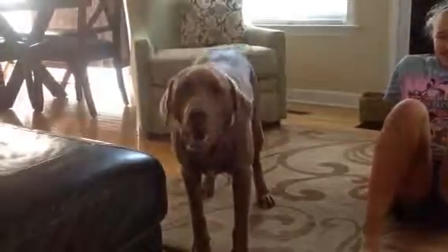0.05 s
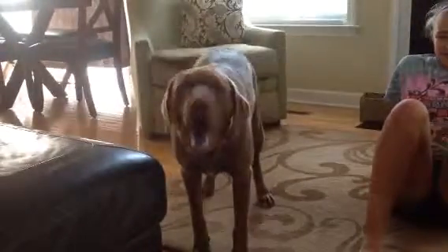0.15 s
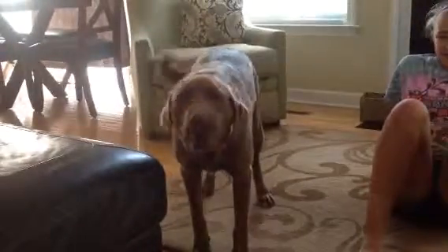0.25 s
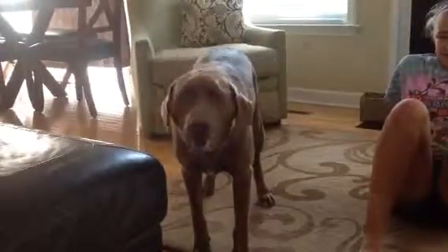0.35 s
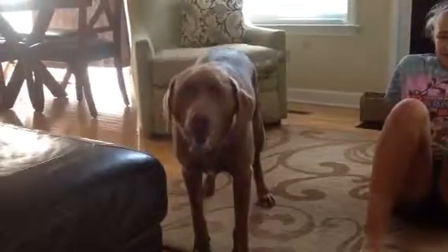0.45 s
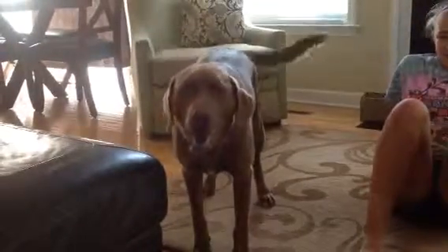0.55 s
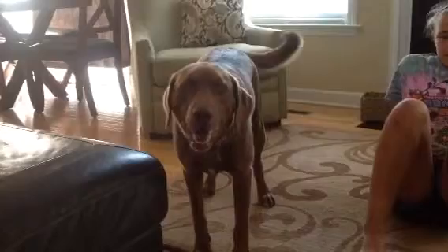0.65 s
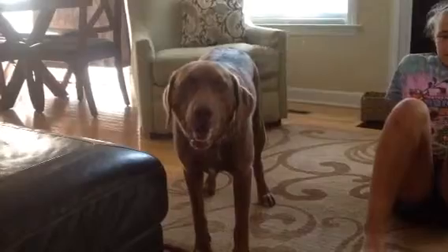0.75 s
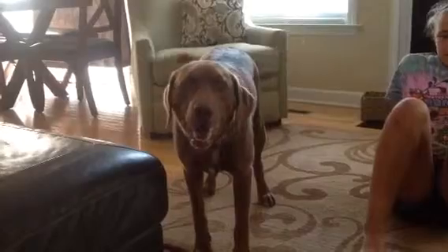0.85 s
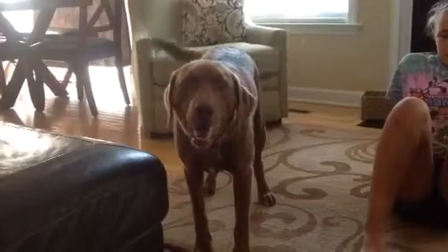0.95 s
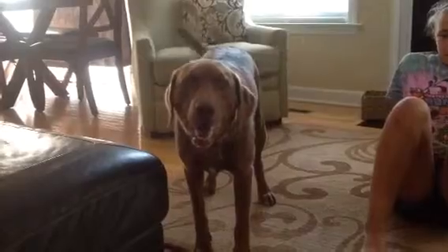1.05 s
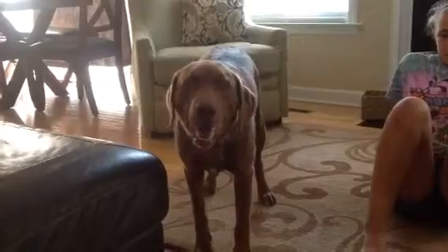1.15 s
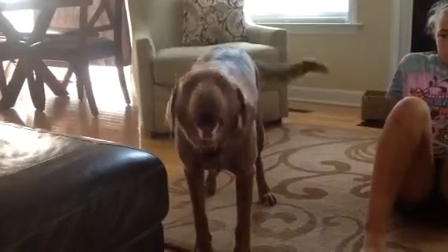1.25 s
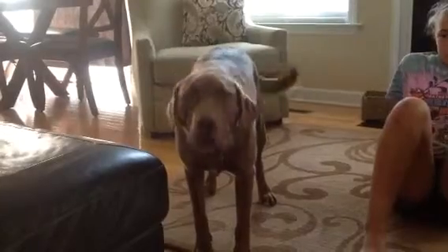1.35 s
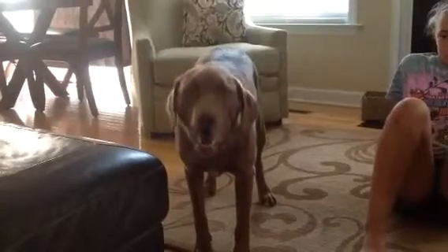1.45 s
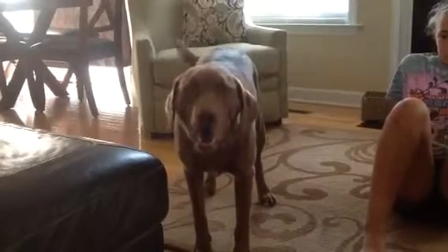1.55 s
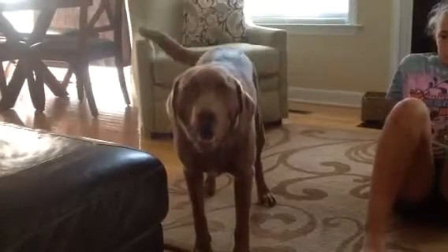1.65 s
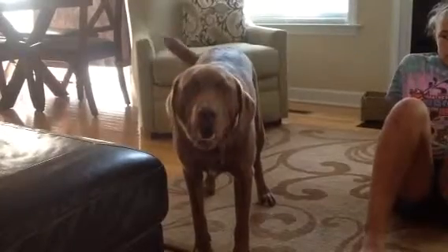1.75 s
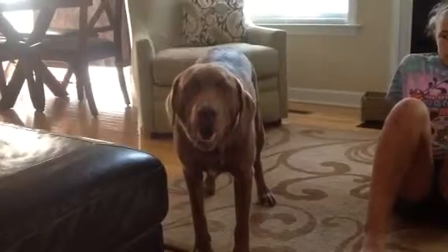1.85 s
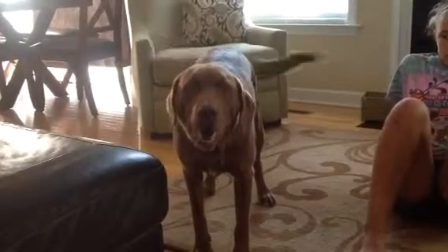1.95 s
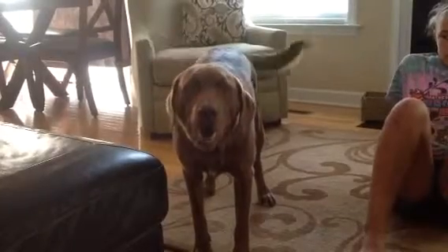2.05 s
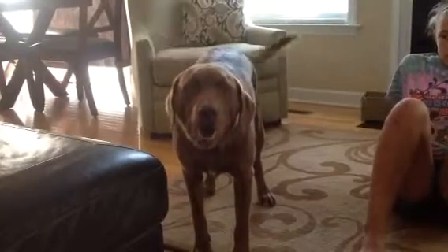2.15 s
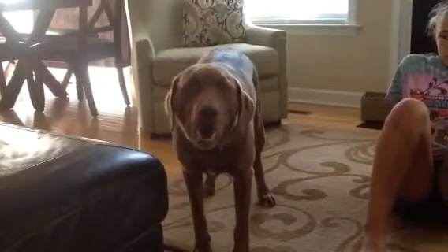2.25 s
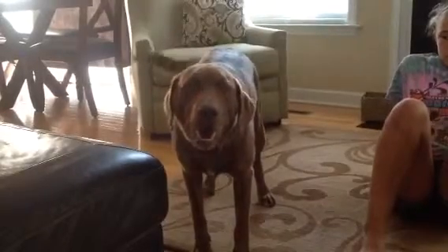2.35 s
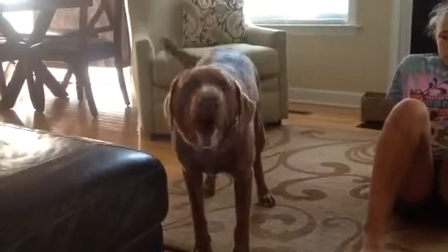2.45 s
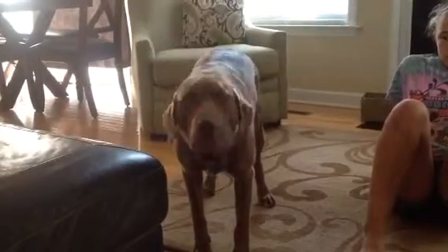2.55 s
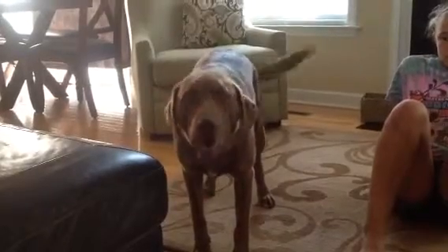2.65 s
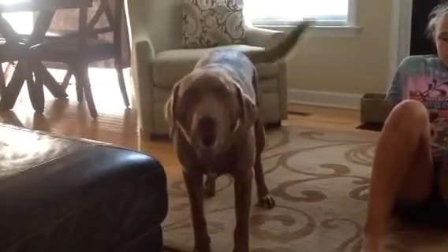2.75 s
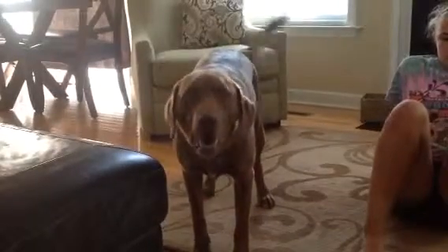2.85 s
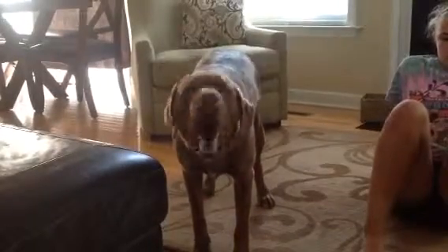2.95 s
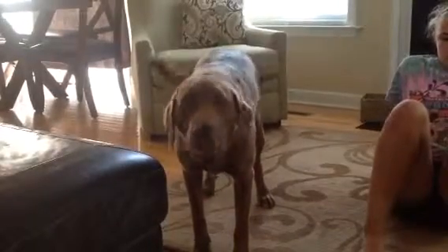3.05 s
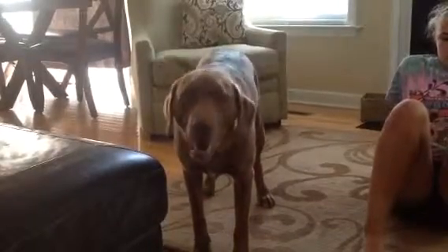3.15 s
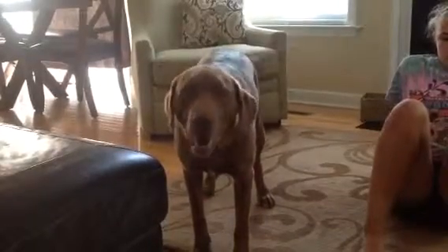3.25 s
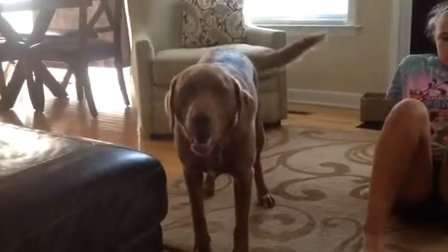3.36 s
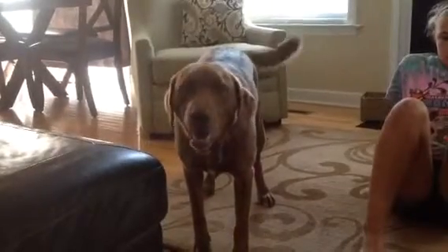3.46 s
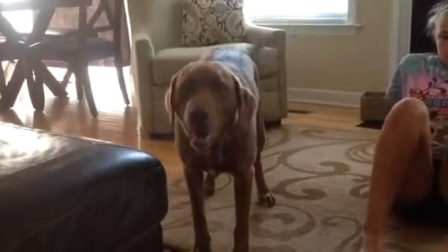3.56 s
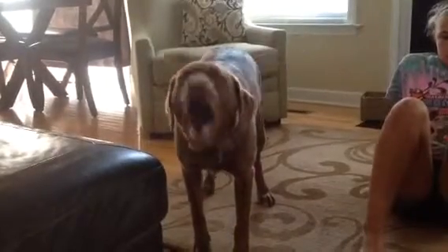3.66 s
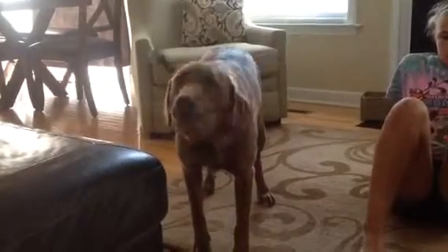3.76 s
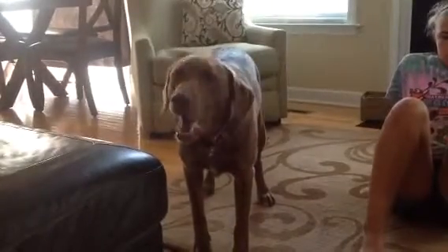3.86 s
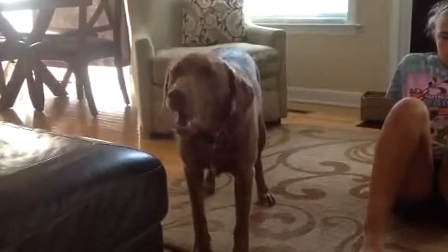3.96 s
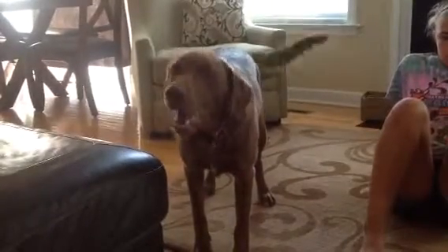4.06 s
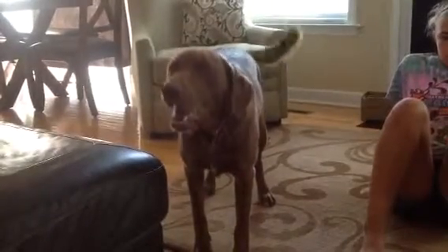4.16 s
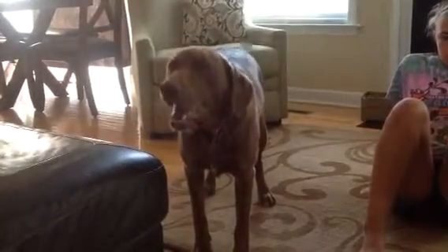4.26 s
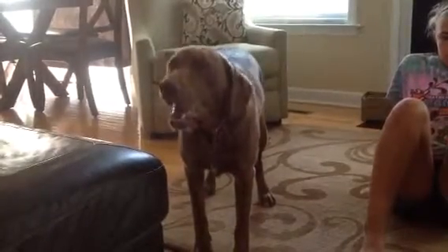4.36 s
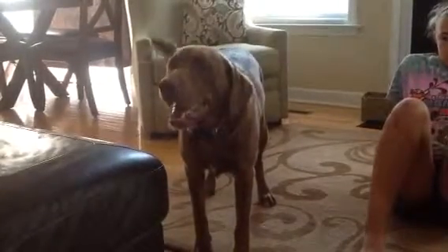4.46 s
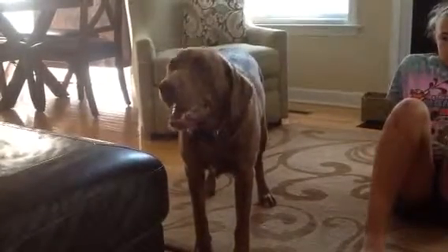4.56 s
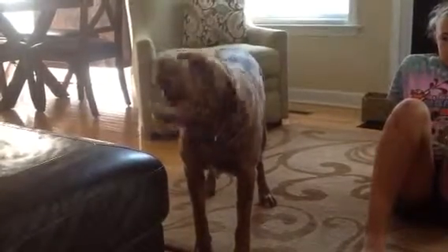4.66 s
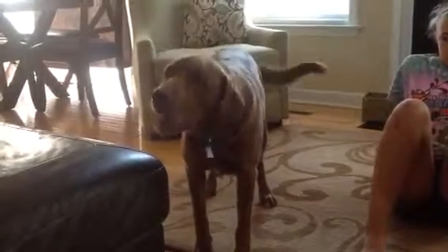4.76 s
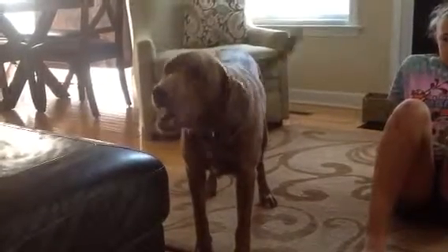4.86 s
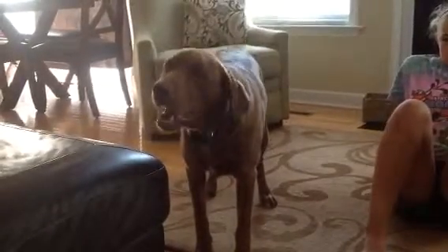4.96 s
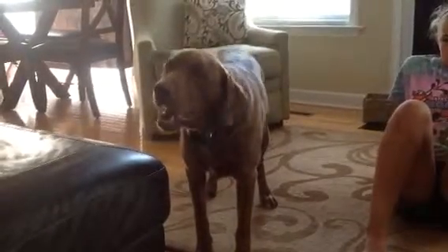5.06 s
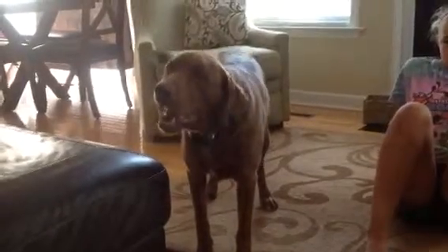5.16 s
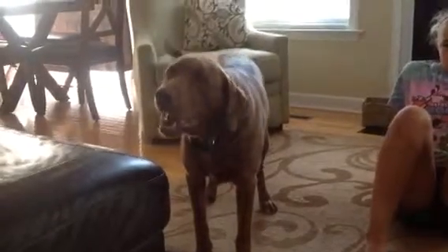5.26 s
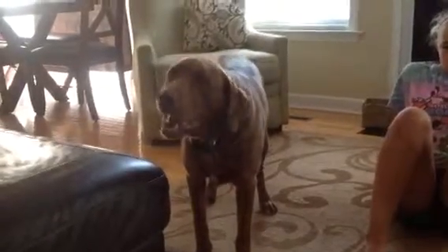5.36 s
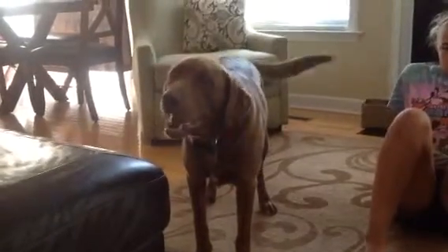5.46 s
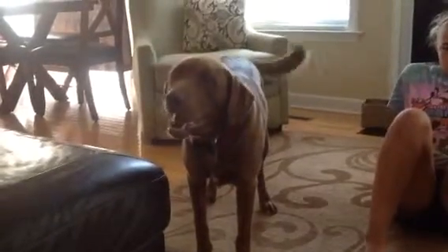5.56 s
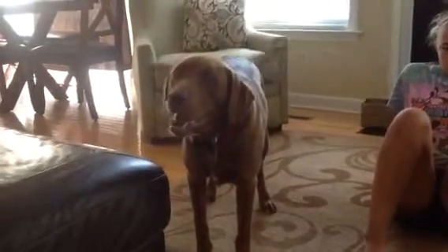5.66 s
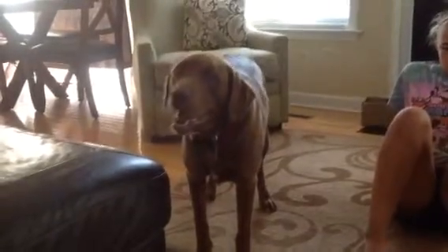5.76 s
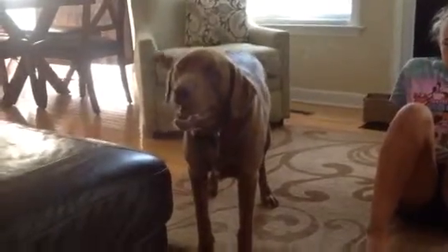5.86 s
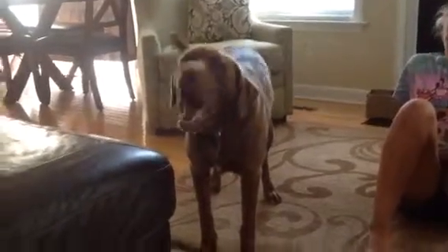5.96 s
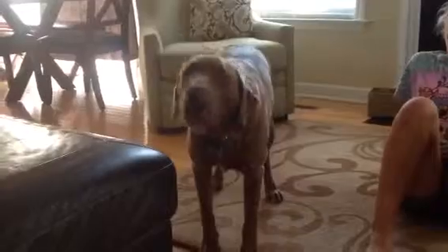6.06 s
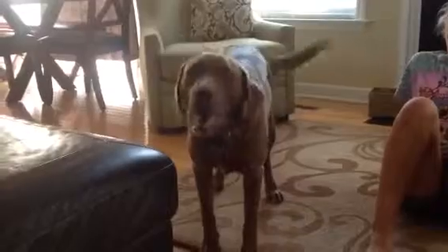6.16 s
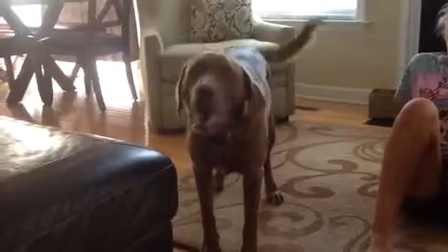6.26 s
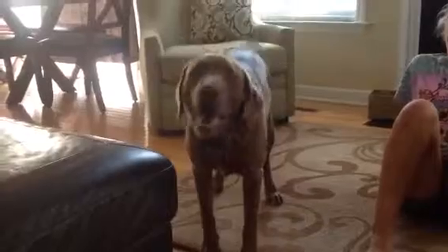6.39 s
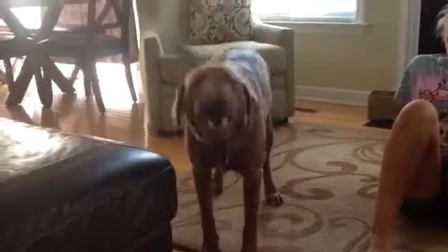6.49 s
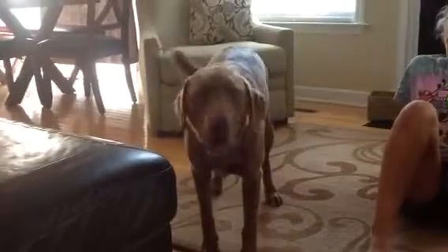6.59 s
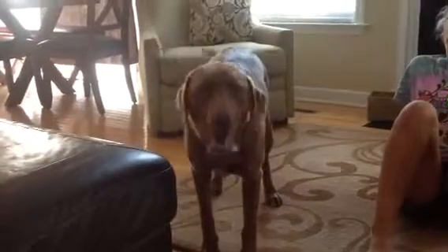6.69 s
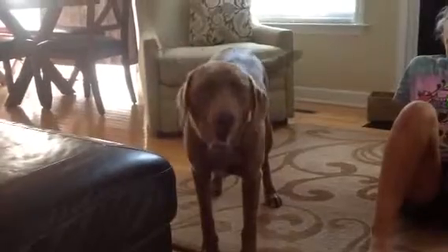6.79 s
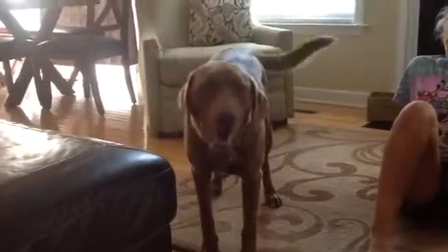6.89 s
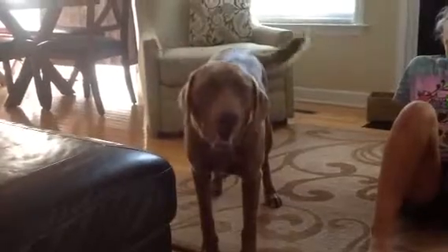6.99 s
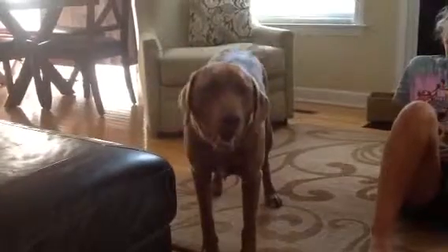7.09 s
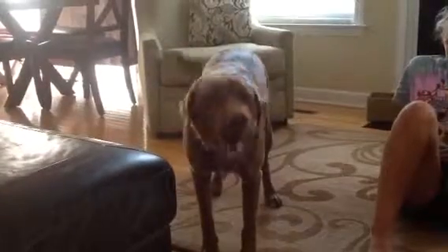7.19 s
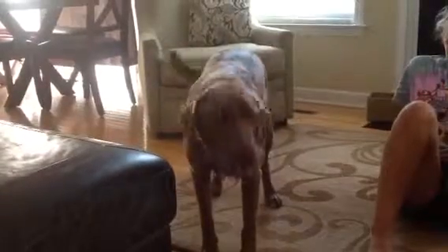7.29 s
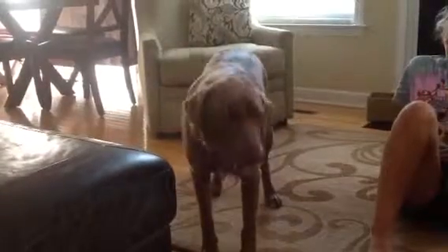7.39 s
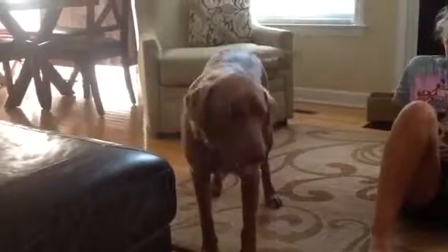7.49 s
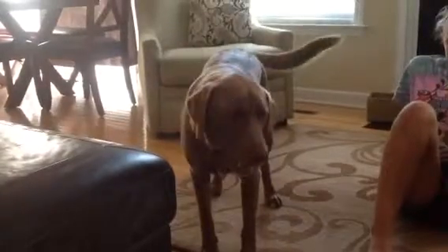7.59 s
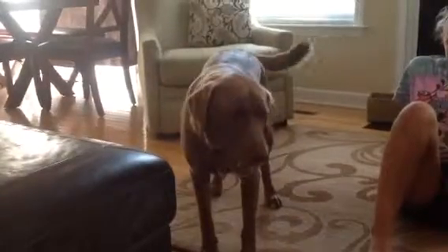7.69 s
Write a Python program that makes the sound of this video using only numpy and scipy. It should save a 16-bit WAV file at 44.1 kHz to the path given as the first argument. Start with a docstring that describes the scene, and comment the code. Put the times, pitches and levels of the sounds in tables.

```python
"""Large dog barking indoors

A large dog barks again and again in a live, wood-floored living room, close to the microphone.
Each bark is a short arch of pitch: pulses and air pass through a moving mouth, and the room rings on.
Between barks the dog grumbles, huffs and whines faintly; collar tags ring in their modes, claws tick.
Steady air noise and a faint hum lie beneath; a limiter dips in coarse, crackling steps under the peaks."""
import sys
import numpy as np
from scipy import signal
from scipy.io import wavfile
from scipy.ndimage import minimum_filter1d

SR = 44100
rng = np.random.default_rng(int(sys.argv[2]) if len(sys.argv) > 2 else 0)


def bounce(signal):
    """Save signal as a 16-bit WAV file at the path given by the first command-line argument."""
    frames = np.transpose(np.atleast_2d(signal))
    limited = np.clip(frames, -1, 1)
    pcm = np.round(limited * 32767).astype(np.int16)
    wavfile.write(sys.argv[1], SR, pcm)


N = 340893


def gain_of(db):
    """Turns decibels into an amplitude factor."""
    return 10 ** (np.asarray(db) / 20)


def evened(x):
    """Scales to an rms of one."""
    return x / np.sqrt(np.mean(x ** 2) + 1e-20)


def read(points, hz):
    """Reads a table along a logarithmic frequency axis."""
    f, value = np.transpose(points)
    return np.interp(np.log(hz + 1), np.log(f + 1), value)


def add(mix, s, sound):
    """Mixes a sound in at s seconds, dropping what lies outside the scene."""
    at = round(s * SR)
    sound = sound[max(-at, 0):]
    part = mix[max(at, 0):][:len(sound)]
    part += sound[:len(part)]


def ramp(x, start, over):
    """Rises in a straight line from 0 at start to 1 at start + over."""
    return np.clip((x - start) / over, 0, 1)


def hold_db(t, end, attack, release):
    """Level in dB: rises until time zero, holds until end, then falls (both in dB a second)."""
    return attack * np.minimum(t, 0) - release * np.maximum(t - end, 0)


def colour(x, points, tilt_db=0, size=2048):
    """Causal filter of rms one: each pulse is followed by the ring of the given spectrum."""
    hz = abs(np.fft.fftfreq(size, 1 / SR))
    tilt_octaves = np.log2(np.clip(hz, 300, 3000) / 1000)  # the tilt is flat outside 300-3000 Hz
    log_gain = np.log(gain_of(read(points, hz) + tilt_db * tilt_octaves))
    minimum_phase = np.exp(np.conj(signal.hilbert(log_gain)))
    taps = np.fft.ifft(minimum_phase).real
    return evened(signal.oaconvolve(x, taps)[:len(x)])


def waver(count, hz):
    """Smooth random drift of rms one: noise low-passed at hz."""
    low_pass = signal.butter(2, hz, fs=SR, output="sos")
    return evened(signal.sosfilt(low_pass, rng.standard_normal(count)))


def pulses(turns, count=40):
    """One sharp pulse for each closing of the vocal folds, summed from count harmonics."""
    harmonics = np.arange(1, count + 1)
    return evened(np.cos(2 * np.pi * np.outer(turns, harmonics)).sum(1))


def puffs(turns, open_share=1.0, leak=0.47):
    """Turbulent air let through once a cycle, over a steady leak."""
    opening = np.exp(-(turns % 1) / open_share)
    return evened((leak + opening) * rng.standard_normal(len(turns)))


def room(x, wet_db, build_s=0.002):
    """Direct sound, first echoes off floor and furniture, and a dense ring drawn anew for each sound."""
    # Ring of the room. Each row: frequency in Hz, time to fall by 60 dB in seconds.
    ring_times = [(100, 0.64), (400, 0.58), (620, 0.64), (830, 0.66), (1200, 0.72), (1650, 0.72),
                  (2600, 0.61), (5000, 0.6), (8000, 0.41), (11000, 0.42), (15000, .45)]
    # First echoes. Each row: delay in seconds, gain relative to the direct sound.
    first_echoes = [(.0031, 0.093), (.0074, .2), (.0118, 0.073), (0.017, .2), (.023, 0.22)]
    count = 3 * SR // 2
    hz, t, z = signal.stft(rng.standard_normal(count), SR, nperseg=256)
    fade = gain_of(-60 * t / read(ring_times, hz)[:, None])
    ring = signal.istft(z * fade, SR, nperseg=256)[1][:count]
    ring *= 1 - np.exp(-(np.arange(count) / SR / build_s) ** 2)
    response = gain_of(wet_db) * ring / np.linalg.norm(ring)
    response[0] += 1  # direct sound
    for delay, gain in first_echoes:
        response[round(delay * SR)] += gain
    return signal.fftconvolve(x, response)


def house_air(db=-54):
    """Steady air noise of the house: random noise shaped by a fixed spectrum."""
    # Spectrum of the air. Each row: frequency in Hz, relative level in dB.
    air_spectrum = [(25, -48.5), (45, -41), (75, -42), (110, -11.5), (160, 3), (230, -4.5), (330, -1),
                    (700, -11.5), (1500, -10.5), (3000, -15), (8000, -24), (15000, -31.5)]
    return gain_of(db) * colour(rng.standard_normal(N), air_spectrum, size=8192)


def hum(db=-65, hz=241):
    """The faint hum of the house: a low tone of slowly unsteady strength."""
    tone = np.sin(2 * np.pi * hz * np.arange(N) / SR)
    return gain_of(db) * evened(tone * (1 + 0.75 * waver(N, hz=6)))


def tick(s, db, decay_s=0.00077):
    """A soft contact: coloured noise under a very short swell that peaks at s."""
    # Spectrum of a contact. Each row: frequency in Hz, relative level in dB.
    contact_spectrum = [(500, -14.5), (2500, -30), (4400, 0), (4950, 17.5), (5600, 1.5), (6700, 10.5),
                        (8000, 3), (15000, -12)]
    t = np.arange(SR // 20) / SR
    touch = t / decay_s * np.exp(1 - t / decay_s)
    noise = colour(rng.standard_normal(len(t)), contact_spectrum)
    return s - decay_s, room(gain_of(db - 0.5) * touch * noise, wet_db=9.5)


def clink(s, db, bright_db, middle_db, swing=0.18):
    """A swinging tag rings in its plate modes; a harder touch favours high ones, the spot struck middle ones."""
    # Modes of the tags. Each row: frequency in Hz, level in dB before the touch, fall by 60 dB in seconds.
    tag_modes = [(4010, -23, .3), (6658, 0, .42), (6672, -10, .3), (9483, -16, .2), (9560, -18, .1),
                 (9900, -21, .12), (10410, -26, .12), (11990, -16, .18), (12080, -15, .14)]
    middle_hz, middle_width_hz = 9500, 900
    pivot_hz = tag_modes[1][0]  # brightness leaves this mode as it is
    t = np.arange(SR) / SR
    ring = 0
    for hz, mode_db, t60 in tag_modes:
        middle = np.exp(-((hz - middle_hz) / middle_width_hz) ** 2)
        touch_db = bright_db * np.log2(hz / pivot_hz) + middle_db * middle
        fade_db = -60 * t / t60
        mode = np.sin(2 * np.pi * hz * t) * (1 + swing * waver(SR, hz=59))
        ring = ring + gain_of(mode_db + touch_db + fade_db) * mode
    return s, room(gain_of(db) * ring, wet_db=3.5)


def huff(s, length, db, bright_db=0):
    """Air through the open muzzle, without voice: a swell of coloured noise."""
    # Resonance of the muzzle. Each row: frequency in Hz, relative level in dB.
    muzzle = [(200, -37), (500, -5), (850, -7), (1100, 4), (1400, -12.5), (1700, 1), (2300, -4),
              (3000, -18), (5000, -27.5), (12000, -39)]
    swell = np.hanning(round(length * SR))
    breath = colour(rng.standard_normal(len(swell)), muzzle, bright_db)
    return s, room(gain_of(db) * swell * breath, wet_db=0.5)


def whine(start, length, first_hz, fall_hz, db):
    """A thin, faint whistle through the nose that swells, fades and falls ever faster."""
    u = np.arange(0, 1, 1 / (length * SR))  # share of the length
    hz = (first_hz - fall_hz * u ** 2) * (1 + .007 * waver(len(u), hz=153))
    turns = np.cumsum(hz) / SR
    swell = np.sin(np.pi * u)
    return start, room(gain_of(db) * swell * np.sin(2 * np.pi * turns), wet_db=-10.0)


def grumble(start, length, rate_hz, db, shimmer=.12, breathy=2.2, swell_db=3):
    """Slow, unequal flaps of the folds behind a nearly shut mouth, dull until the lips part."""
    # Throat with the lips shut. Each row: frequency in Hz, relative level in dB.
    lips_shut = [(25, -45), (85, -22), (170, -13), (330, 2), (600, 2), (800, -5.5), (1600, -28),
                 (3000, -27), (4000, -52)]
    # Throat with the lips parted. Each row: frequency in Hz, relative level in dB.
    lips_parted = [(200, -50.5), (600, 4.5), (1250, -7), (1650, -2), (2000, -8), (2350, -5), (2700, -22),
                   (3000, -12), (3500, -28.5), (8000, -24.5), (15000, -41)]
    gape_first, gape_last, part_s = 0.3, 0.78, .045  # share of the parted sound; the lips part at the end
    sag = 0.17  # share by which the rate is lower at both ends
    t = np.arange(-.015, length + .025, 1 / SR)
    along = ramp(t, 0, length)
    slack = 1 - np.sin(np.pi * along)
    mouth = gape_first + (gape_last - gape_first) * ramp(t, length - part_s, part_s)
    hz = rate_hz * (1 - sag * slack) * (1 + .035 * waver(len(t), hz=60))
    turns = np.cumsum(hz) / SR
    turns -= np.interp(0, t, turns)  # a flap falls on the start
    flaps = pulses(turns, count=38) * (1 + shimmer * waver(len(t), hz=60))
    dull = colour(flaps, lips_shut)
    clear = colour(flaps + breathy * puffs(turns), lips_parted)
    voice = (1 - mouth) * dull + mouth * clear
    level_db = db + swell_db * (along - .5) + hold_db(t, length, attack=2600, release=1403)
    return start + t[0], room(gain_of(level_db) * voice, wet_db=-3.5)


def pitch_arch(u):
    """A flat-topped arch over shares of a bark's length; a higher power makes a flank squarer."""
    crest, climb, drop = .68, .55, .56  # shares of the length
    away = abs(u - crest)
    arch = np.exp(-np.where(u < crest, (away / climb) ** 2.8, (away / drop) ** 2.3))
    return arch, u < crest


def bark(start, length, low_hz, top_hz, effort_db, bright_db, hiss_db, jitter=.11, uneven=1.1, split=0.17):
    """The folds start as slow claps, are clear at the top of the arch and break up as the pitch drops."""
    # Throat as the jaws begin to part. Each row: frequency in Hz, relative level in dB.
    jaws_parting = [(30, -37), (120, -36), (220, -65), (320, -7), (420, -12.5), (590, 3.5), (720, -10.5),
                    (920, -10), (1100, 1), (1300, -8), (1530, -0.5), (2000, -4), (2330, -6), (2700, -30),
                    (4600, -28.5), (9000, -55)]
    # Throat with the mouth wide open. Each row: frequency in Hz, relative level in dB.
    wide_open = [(30, -65), (120, -40), (260, -10), (400, -2), (500, -10.5), (620, 3), (830, 6.5),
                 (930, -6), (1150, 6), (1380, -11), (1670, 3.5), (1800, -3), (2080, -5.5), (2600, -46),
                 (4800, -38.5), (9000, -42.5)]
    # Throat behind nearly shut lips. Each row: frequency in Hz, relative level in dB.
    nearly_shut = [(120, -46.5), (220, -31), (310, -0.5), (450, -5.5), (630, -3), (1200, -15.5),
                   (3000, -39)]
    # Air rushing past the teeth. Each row: frequency in Hz, relative level in dB.
    teeth = [(200, -44.5), (900, -36), (2100, 6), (2700, -10), (3100, 2), (3800, -16), (4400, 1),
             (5000, 7.5), (5350, 1.5), (5800, -3.5), (7300, -2), (9000, -7.5), (11000, -11.5), (15500, -27)]
    t = np.arange(-.015, 1.6 * length, 1 / SR)
    u = t / length
    arch, before_crest = pitch_arch(u)
    hz = low_hz + (top_hz - low_hz) * arch
    octaves = np.log2(hz / top_hz)

    # roughness (0-1): on a held pitch, added in mid-climb, added as the folds let go
    rough = .1 + .14 * np.sin(np.pi * arch) * before_crest + 0.21 * ramp(u, .85, .17)
    rough = np.clip(rough, 0, 1)
    # the jaws open, then close again, never below the least gape (0-1)
    least_gape = 0.27
    gape = least_gape + (1 - least_gape) * (ramp(u, 0.31, 0.16) - ramp(u, 0.93, 0.17))

    turns = np.cumsum(hz * (1 + jitter * rough * waver(len(t), hz=198))) / SR
    turns -= np.interp(0, t, turns)  # the first full clap falls on the start
    # strong and weak beats come to alternate
    alternation = (split + uneven * rough) * ramp(u, 0, 0.4) * np.cos(np.pi * turns)
    folds = pulses(turns) * (1 + alternation)
    drive = (1 - rough) * folds + rough * puffs(turns)
    drive = drive * gain_of(0.71 * waver(len(t), hz=157))

    voice = (1 - gape) * colour(drive, jaws_parting, bright_db) + gape * colour(drive, wide_open, bright_db)
    woof = (1 - gape) * colour(drive, nearly_shut)
    flicker_db = 2.9 * waver(len(t), hz=97)
    hiss = gain_of(hiss_db + flicker_db) * colour(puffs(turns, open_share=1.0, leak=0.36), teeth)

    # voice and hiss swell with the pitch (dB at the crest, dB per octave); the hiss outlasts the voice
    attack = 5499  # breath pressure snaps on, in dB a second
    voice_db = 10.5 + 13.5 * octaves + hold_db(t, length, attack, release=434.5)
    rush_db = -9.5 + 20.5 * octaves + hold_db(t, 1.5 * length, attack, release=400.5)
    # the dull woof starts sooner and dies later than the open cry
    woof_db = -9.5 + hold_db(t, 1.07 * length, attack=2701.5, release=249.5)
    sound = gain_of(voice_db) * voice + gain_of(woof_db) * woof + gain_of(rush_db) * hiss
    return start + t[0], gain_of(effort_db) * room(sound, wet_db=-6.5)


def scene():
    """The dog and its collar over the quiet of the house."""
    # Soft ticks of claws and collar. Each row: time in seconds, level in dB before tick() takes off 0.5.
    ticks = [(4.351, -51), (5.44, -62), (5.461, -48.5), (5.618, -47), (5.643, -45.5)]
    # Collar tags striking. Each row: time in seconds, level in dB, brightness in dB per octave,
    # lift of the middle modes in dB.
    clinks = [(0, -46, -5, 4), (1.55, -51.5, 9, -1), (1.883, -62, 0, -3), (2.848, -48, -15, 2),
              (3.595, -64, -9, 0), (3.981, -48, 7, 9), (4.6, -53, -8, 0), (4.912, -29, 10, -2.5),
              (5.202, -35.5, 7.5, 1), (6.43, -52, -8, 0), (6.844, -30, 3, 0), (7.151, -47.5, 22, 0),
              (7.512, -38.5, 9, 9)]
    # Soft huffs between barks. Each row: start in seconds, length in seconds, level in dB.
    huffs = [(0.928, 0.054, -40), (1.107, 0.083, -48.5), (2.036, 0.087, -46.5), (4.332, 0.05, -42),
             (4.517, .091, -48), (5.358, 0.067, -46.5)]
    # Grumbles. Each row: start in seconds, length in seconds, mid-grumble pulses a second, level in dB.
    grumbles = [(1.774, 0.06, 88, -32), (2.104, 0.13, 88, -28.5), (5.257, 0.0103, 88, -35.5)]
    # Barks. Each row: start in seconds, length in seconds, pitch at the foot of the arch in Hz,
    # pitch at its top in Hz, effort in dB, brightness in dB per octave, hiss in dB.
    barks = [(-.225, 0.078, 202.2, 421, 1.5, 0.5, -4), (0.209, 0.1, 171.9, 406.6, 1, 0, 0),
             (1.2468, 0.086, 216.1, 427, 3, 0, -0.5), (2.494, 0.096, 192.4, 429.2, 3, 1, -1.5),
             (2.976, 0.096, 164.1, 420.3, 3, .5, -2), (3.678, 0.091, 212.8, 424.8, 3.5, 0.5, -1.5),
             (4.648, 0.099, 204.7, 417.3, 2, 1, -1.5), (5.98, 0.13, 145, 422, 1, 0.5, -2),
             (6.476, 0.092, 196.6, 413.6, 2, 1, -1), (7.189, .106, 177.6, 413.5, 0.5, -0.5, -1.5)]
    mix = house_air() + hum()
    for source, table in (tick, ticks), (clink, clinks), (huff, huffs), (grumble, grumbles), (bark, barks):
        for row in table:
            add(mix, *source(*row))
    for s, db, *_ in clinks:
        add(mix, *tick(s, db - 11.5))  # the contact of two tags
    add(mix, *whine(.765, length=.112, first_hz=4830, fall_hz=880, db=-53))
    for start, *_ in barks:
        # air escapes just before the folds close
        add(mix, *huff(start - 0.021, length=0.024, db=-28, bright_db=4))
    return mix[None]


def round_off(x, top, knee):
    """Soft overload: peaks bend toward the top value."""
    return x / (1 + abs(x / top) ** knee) ** (1 / knee)


def limit(x, ceiling_db=-1, recover_db_per_s=200, step_db=3.0, size=20):
    """Peak limiter: the gain drops in coarse steps under each new peak, which crackles, and soon recovers."""
    peak = -minimum_filter1d(-abs(x), size)  # greatest value within size samples
    over_db = np.maximum(20 * np.log10(peak + 1e-9) - ceiling_db, 0)
    stepped_db = np.ceil(over_db / step_db) * step_db
    fall = np.arange(N) * recover_db_per_s / SR
    held_db = np.maximum.accumulate(stepped_db + fall) - fall
    ease = np.hanning(size - 2)
    return x / gain_of(np.convolve(held_db, ease / ease.sum(), "same"))


def record(dry):
    """The microphone bends on the loudest peaks; then the limiter, the output stage and the band limit."""
    bent = round_off(dry[0], top=14, knee=2.5)
    lopsided = bent + 0.0051 * bent ** 2
    out = round_off(limit(lopsided), top=1.0, knee=12.0)
    band_limit = signal.firwin(511, 15650, window=("kaiser", 9), fs=SR)  # cutoff in Hz
    return signal.oaconvolve(out, band_limit, "same")[None]


dry = scene()
out = record(dry)
bounce(out)
```